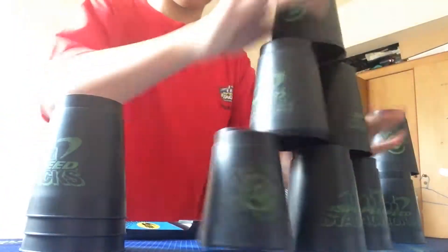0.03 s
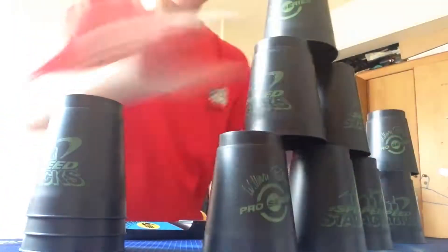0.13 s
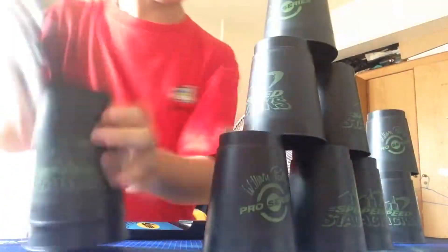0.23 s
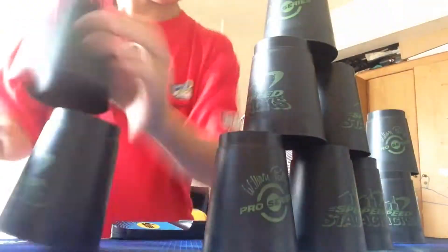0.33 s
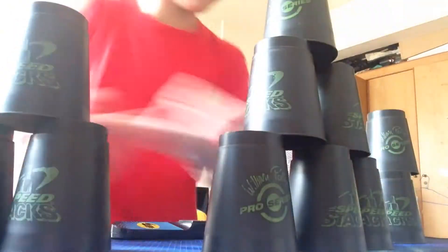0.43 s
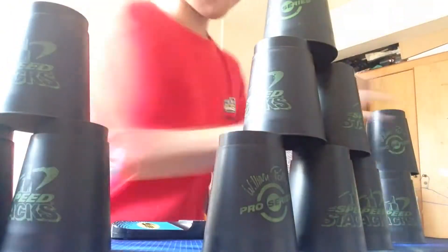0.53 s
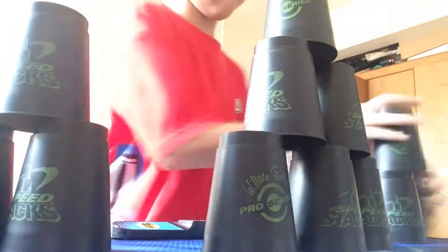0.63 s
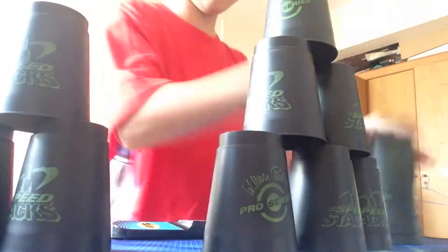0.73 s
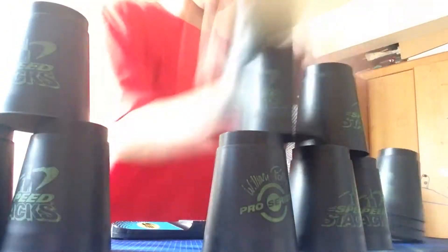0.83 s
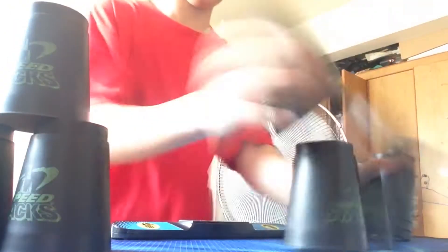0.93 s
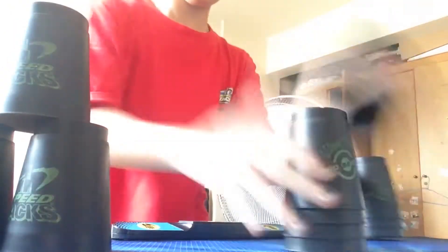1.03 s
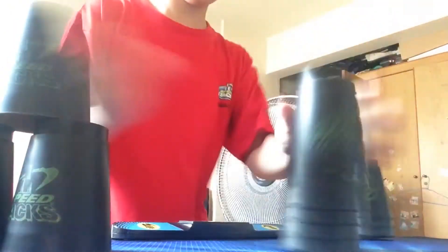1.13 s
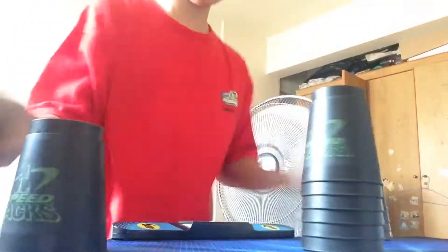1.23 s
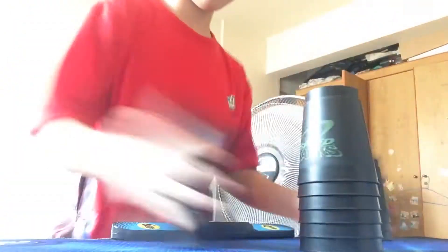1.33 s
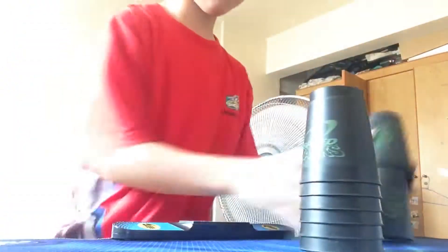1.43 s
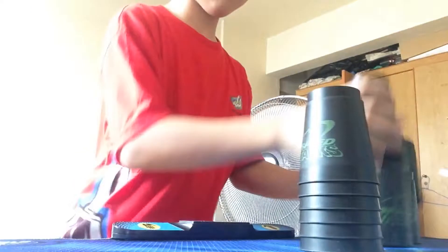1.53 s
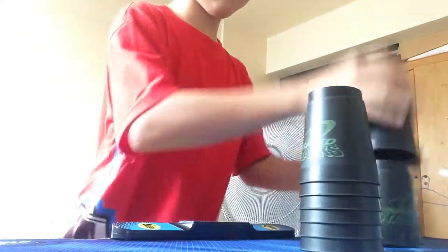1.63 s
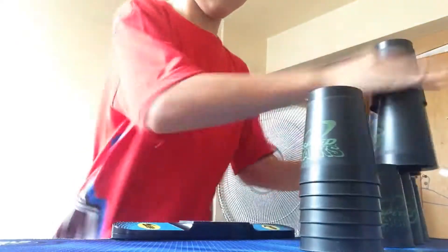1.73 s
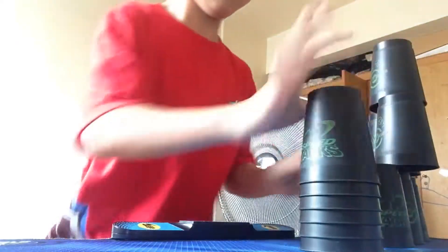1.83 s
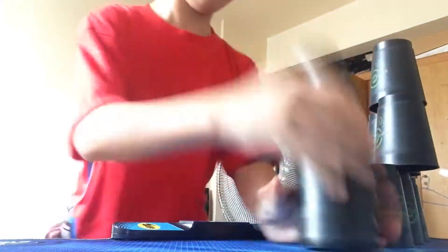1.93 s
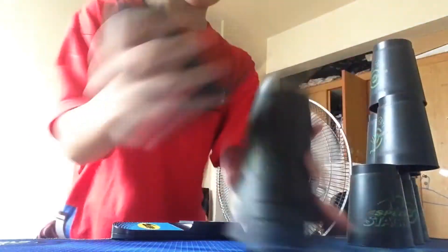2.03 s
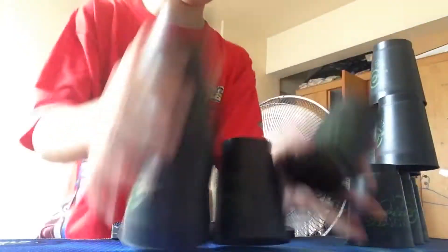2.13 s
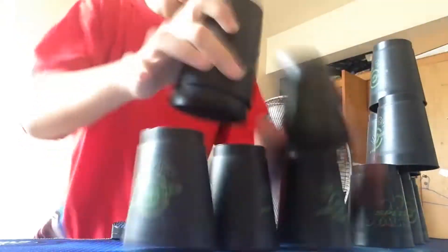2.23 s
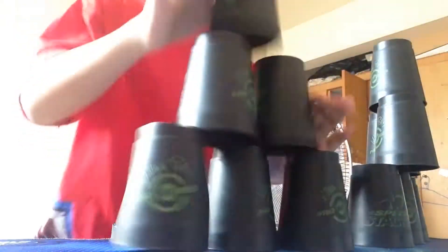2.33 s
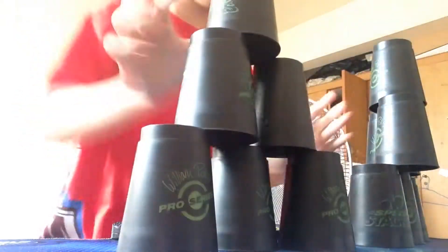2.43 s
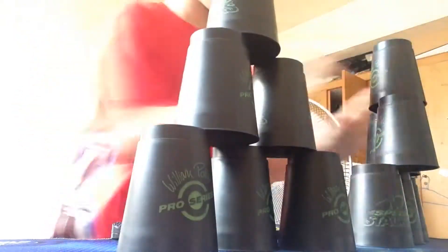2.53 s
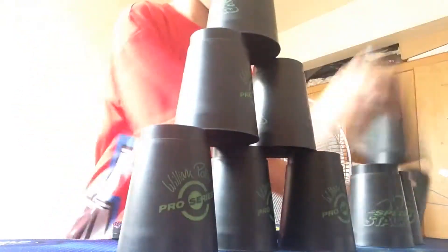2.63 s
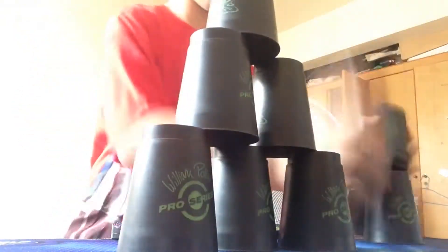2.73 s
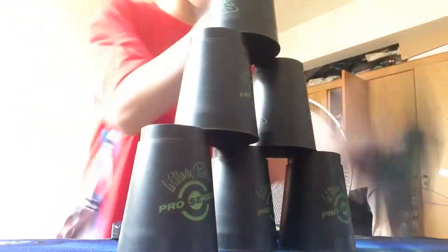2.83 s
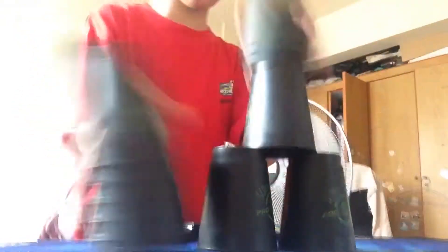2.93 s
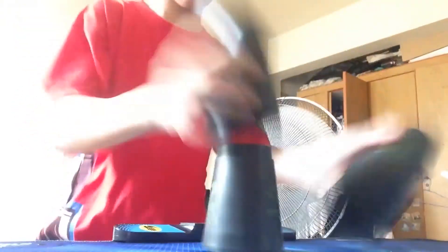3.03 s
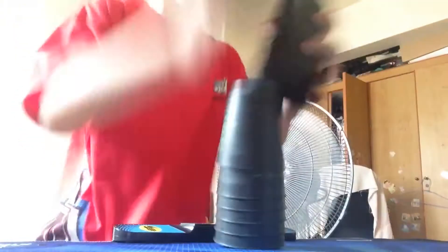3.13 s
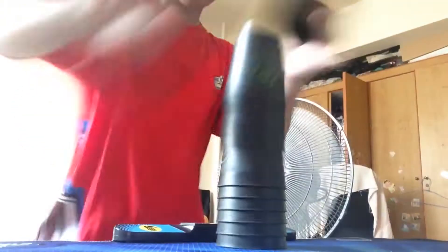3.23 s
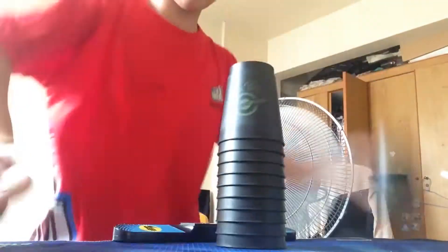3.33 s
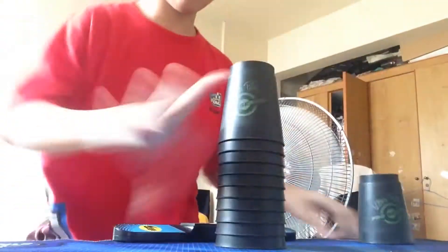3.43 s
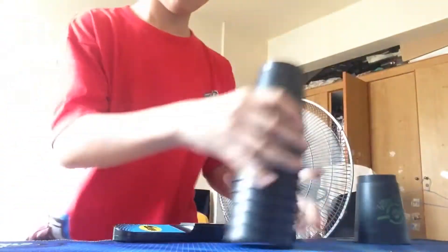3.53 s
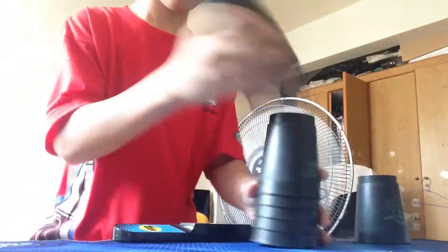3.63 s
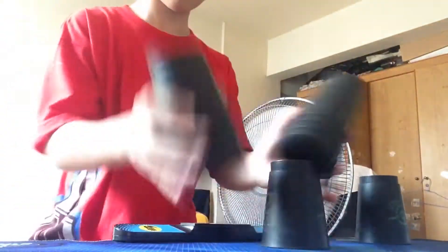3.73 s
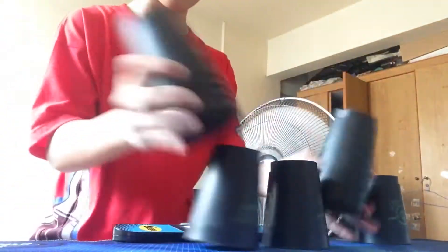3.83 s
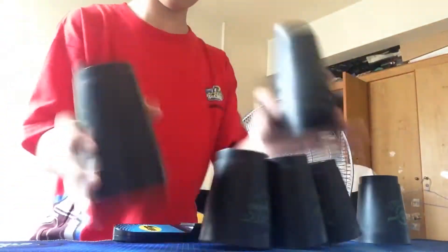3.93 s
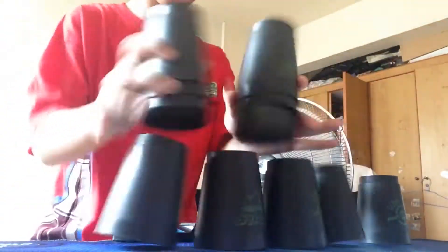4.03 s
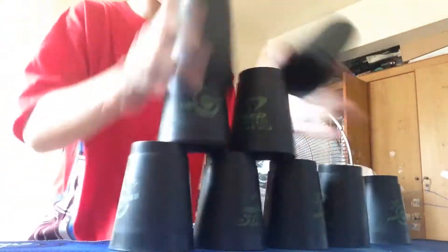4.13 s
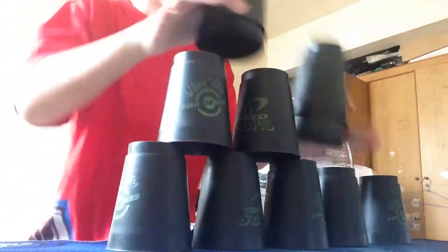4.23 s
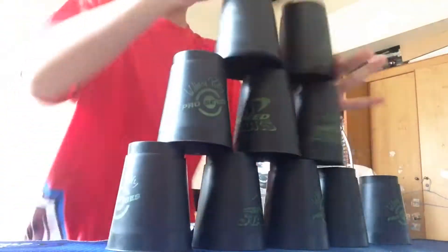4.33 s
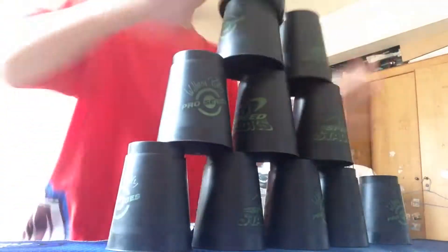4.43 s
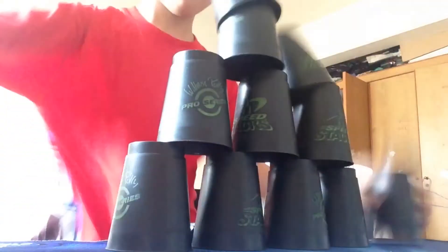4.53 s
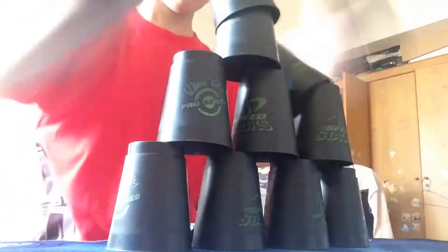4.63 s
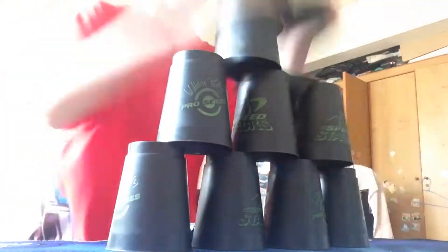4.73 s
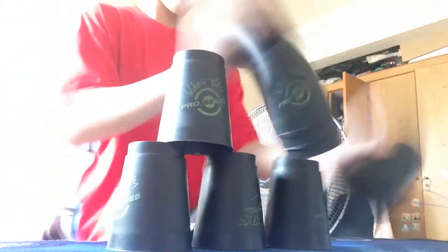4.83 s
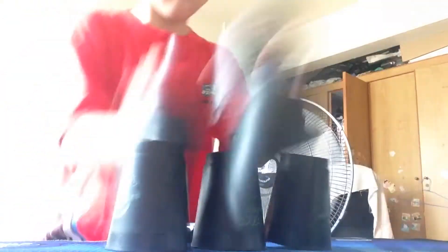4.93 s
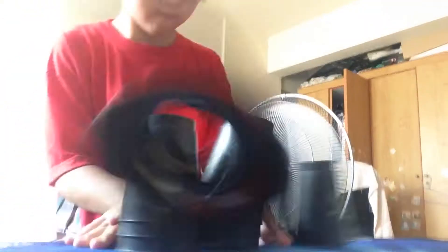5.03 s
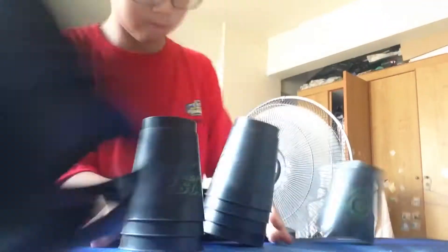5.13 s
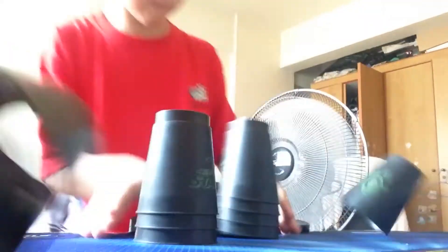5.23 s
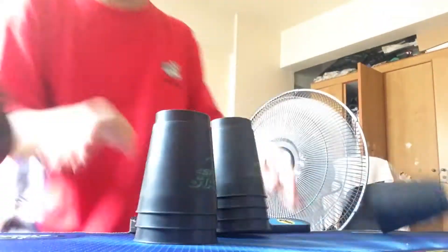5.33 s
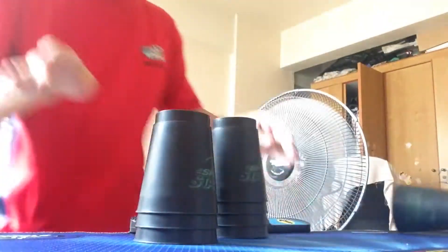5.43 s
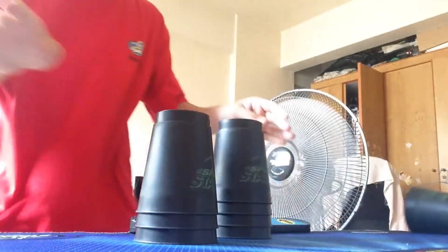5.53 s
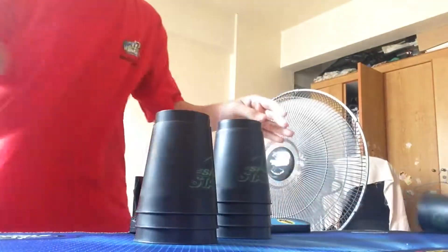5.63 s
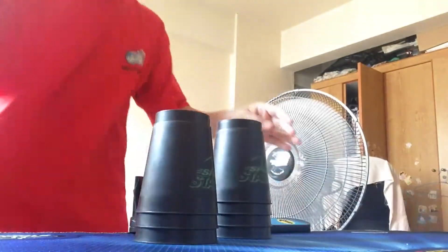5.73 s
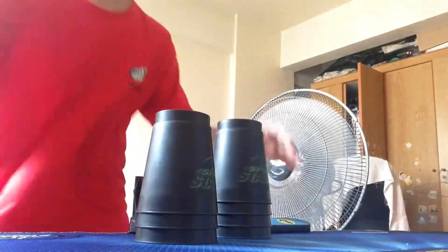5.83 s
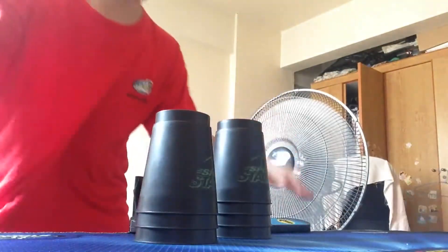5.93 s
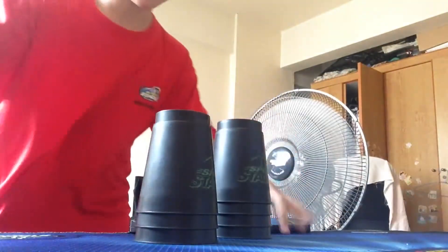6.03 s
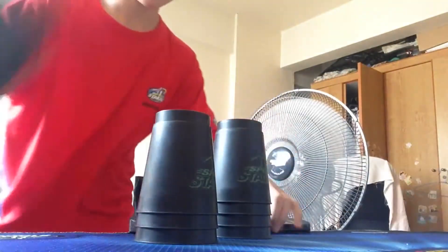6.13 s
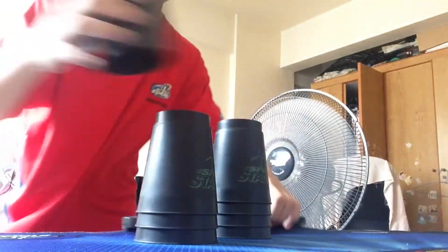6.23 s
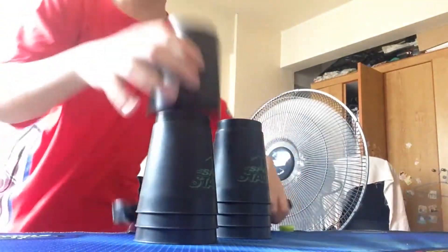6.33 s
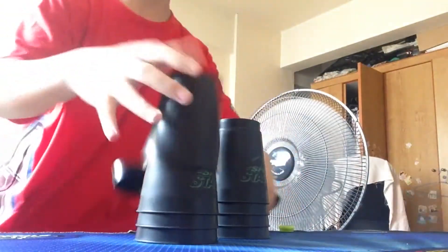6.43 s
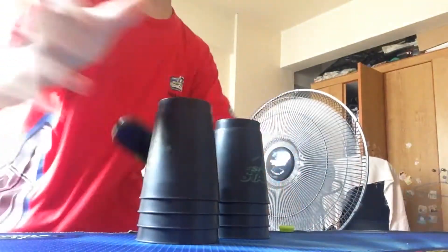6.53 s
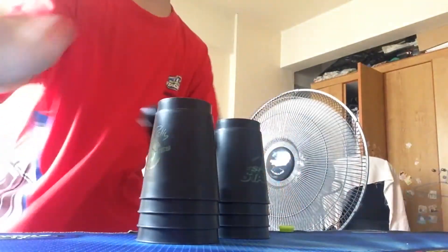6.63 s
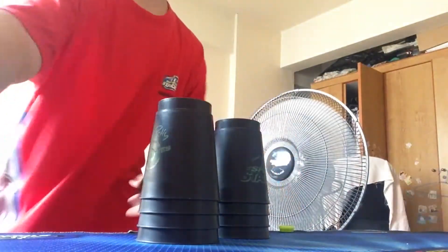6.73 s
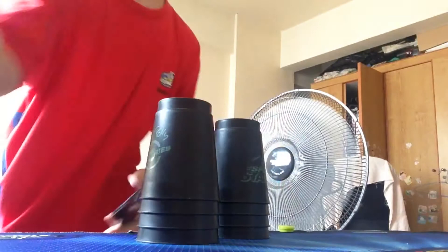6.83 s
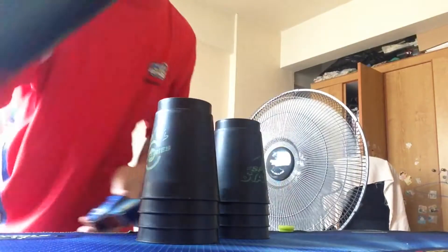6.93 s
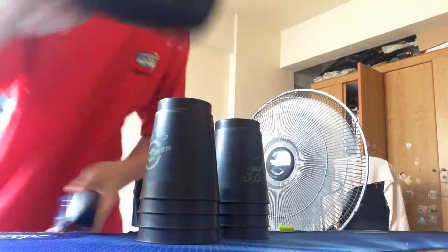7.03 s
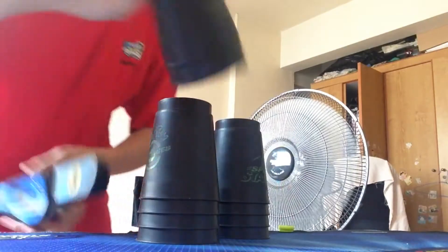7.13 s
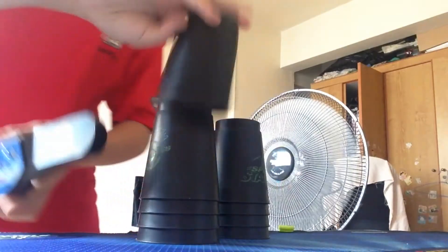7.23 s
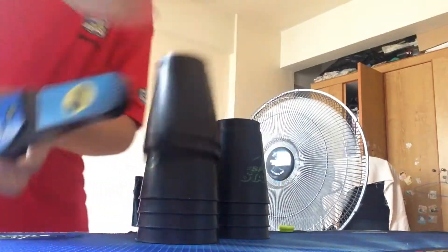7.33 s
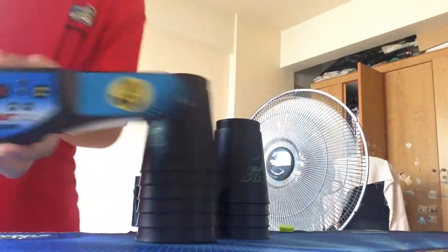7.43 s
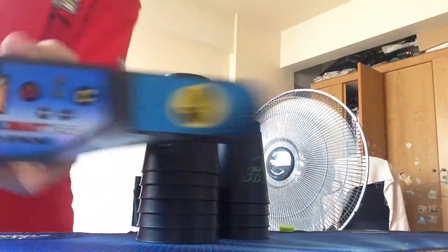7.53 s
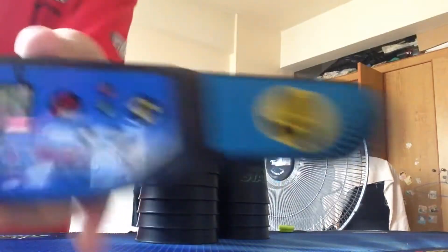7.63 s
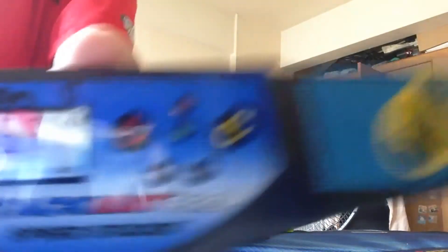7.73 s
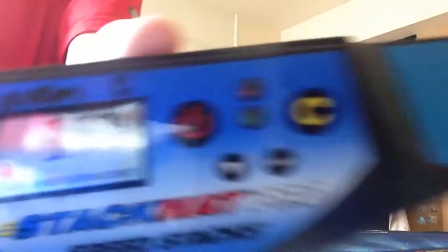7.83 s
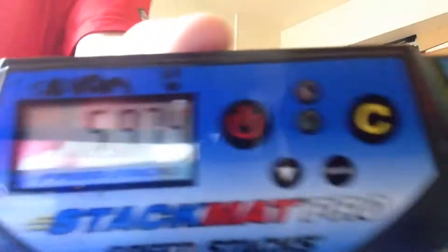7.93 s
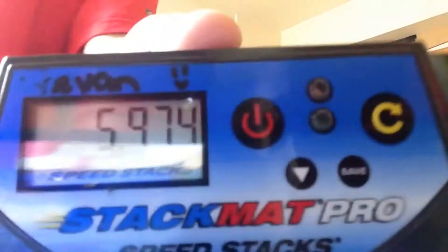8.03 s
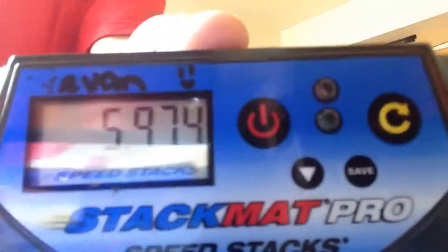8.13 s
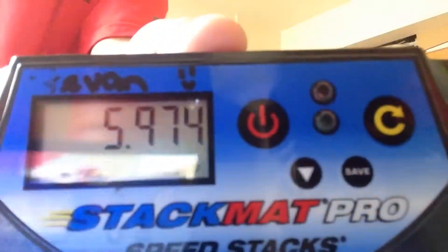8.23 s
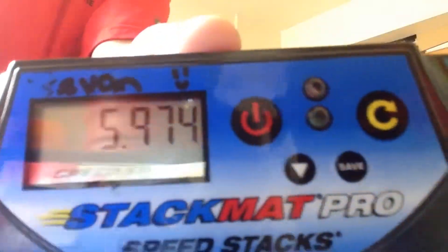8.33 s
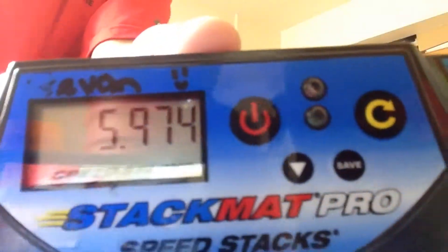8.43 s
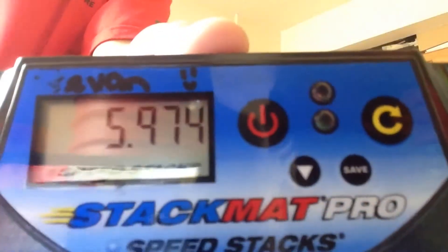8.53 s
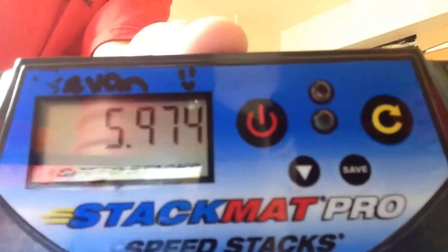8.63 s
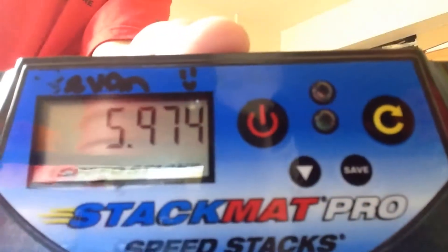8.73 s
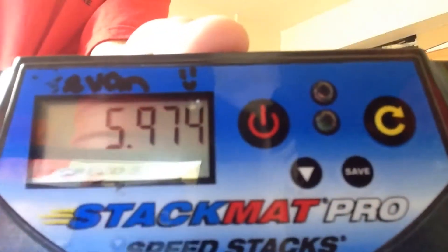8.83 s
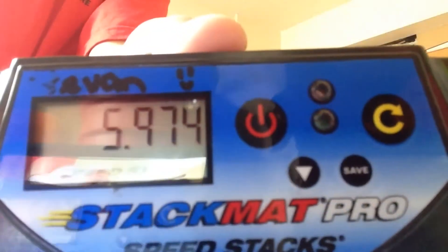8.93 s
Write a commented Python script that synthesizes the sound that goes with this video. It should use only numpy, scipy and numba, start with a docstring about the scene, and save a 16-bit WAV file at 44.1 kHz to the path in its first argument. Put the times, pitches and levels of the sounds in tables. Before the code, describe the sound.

Hollow plastic cups clatter, pop and rattle in rapid bursts as they are stacked and swept down over a steady fan hum.

```python
"""A small room with a humming fan: plastic cups are stacked into pyramids and swept down at speed on a mat,
right in front of a small microphone. Each contact pumps the air in a cup, rings its wall and ticks at the rim.
Nesting cups chatter on random bumps and scrape on gritty noise; damped low modes make soft bumps on the table.
The fan is a set of wavering blade tones over coloured noise.
At the end a timer is lifted, held before the microphone, where it colours the fan's air, and handled."""
import sys
import numpy as np
from scipy import signal
from scipy.fft import rfft, irfft
from scipy.io import wavfile
from scipy.ndimage import uniform_filter1d, minimum_filter1d
from numba import njit

SR = 44100
rng = np.random.default_rng(int(sys.argv[2]) if len(sys.argv) > 2 else 0)


def file_out(sig):
    """Save sig as 16-bit WAV at sys.argv[1]."""
    # one column per channel
    cols = np.atleast_2d(sig).T
    # limit, then scale
    lim = np.clip(cols, -1, 1)
    pcm = np.round(lim * 32767).astype(np.int16)
    wavfile.write(sys.argv[1], SR, pcm)


N = 396018
TIME = np.arange(N) / SR  # seconds


def undb(db):
    """Decibels to gain."""
    return 10 ** (np.asarray(db) / 20)


def unit(x):
    """Scale to rms 1."""
    return x / np.sqrt(np.mean(x ** 2) + 1e-20)


def blow(x):
    """Scale to the energy of 5 ms at rms 1, so that short and long rings strike equally hard."""
    return x * np.sqrt(SR / 200 / (np.sum(x ** 2) + 1e-20))


def add(out, s, x):
    """Mix x into out, starting at s seconds."""
    i = max(int(s * SR), 0)
    out[i:i + len(x)] += x[:max(len(out) - i, 0)]


def fade(t, t60):
    """Exponential decay by 60 dB in t60 seconds."""
    return np.exp(-np.log(1000) * t / t60)


def ring(t, hz, t60):
    """One struck mode: a sine that dies away."""
    return np.sin(2 * np.pi * hz * t) * fade(t, t60)


def through(x, response):
    """Pass a sound through an impulse response."""
    return signal.fftconvolve(x, response)[:len(x)]


def colour(points, size=512):
    """Minimum-phase impulse response with the given (Hz, dB) spectrum."""
    hz, db = np.transpose(points)
    bins_hz = np.arange(size // 2 + 1) * SR / size
    gain = undb(np.interp(np.log(bins_hz + 1), np.log(hz), db))
    # folding the cepstrum forward makes the response causal
    cepstrum = irfft(np.log(gain))
    cepstrum[1:size // 2] *= 2
    cepstrum[size // 2 + 1:] = 0
    return irfft(np.exp(rfft(cepstrum)))


def resonator(modes):
    """Impulse response of (Hz, dB, t60) modes, each with the given gain at its peak."""
    t = TIME[:SR // 2]
    return sum(undb(db) * ring(t, hz, t60) * 2 * np.log(1000) / (t60 * SR) for hz, db, t60 in modes)


def walk(rate):
    """Random drift in straight lines between normal draws, rate of them per second."""
    knots = rng.standard_normal(int(N / SR * rate) + 2)
    return np.interp(TIME * rate, np.arange(len(knots)), knots)


# Spectrum of the fan's rush of air in the open. Each row: frequency in Hz, relative level in dB.
AIR_OPEN = [(25, -31), (50, 10), (90, 1.5), (200, 1.5), (350, -2.5), (650, -4), (1300, -5), (1900, -11.5),
            (3000, -16), (5000, -18), (8000, -23.5), (12000, -33), (15500, -35)]
# The same rush with the timer before the microphone. Each row: frequency in Hz, relative level in dB.
AIR_SCREENED = [(30, -18), (60, -4), (100, -11.5), (200, -5), (300, -9), (450, -12.5), (620, -11.5),
                (1100, -14), (1500, -16), (1900, -24.5), (2250, -20.5), (3100, -21.5), (3900, -27),
                (6500, -30), (15000, -43)]
# The timer moves in front of the microphone: start and end in seconds.
TIMER_UP_S = [7.57, 7.9]
# Blade tones. Each row: multiple of the blade rate, rms level in dB before the moves of FAN_PATH.
BLADE_TONES = [(1, -47.5), (2, -42), (3, -48), (4, -49.5), (7, -90), (8, -52.5), (10, -55)]
# The fan as the body and then the timer screen it.
# Each row: time in seconds, gain of the air in dB, of the upper tones in dB, of the lowest tone in dB.
FAN_PATH = [(0, -1, 0.5, 5), (3.5, 0, -0.5, 0), (5.2, 6.5, 2.5, -13), (5.7, 0, -4, 4),
            (6.5, 2.5, 3.5, -0.5), (7.4, 0, -2, 6), (7.9, -1.5, -4, -28), (8.4, -3.5, -3, 7),
            (9, -2, -8, -2)]
BLADE_HZ = 68  # mean blade rate


def fan(air_db=-38):
    """Blade tones waver over the rush of air; the timer colours the rush once it is held up close."""
    s, *columns = np.transpose(FAN_PATH)
    air, upper, lowest = (undb(np.interp(TIME, s, column)) for column in columns)
    phase = 2 * np.pi * np.cumsum(BLADE_HZ * (1 + 0.00324 * walk(3))) / SR
    tones = []
    for multiple, db in BLADE_TONES:
        start = 2 * np.pi * rng.random()
        tones.append(np.sqrt(2) * undb(db) * np.sin(round(multiple) * phase + start))
    free = unit(through(rng.standard_normal(N), colour(AIR_OPEN, size=4096)))
    screened = unit(through(rng.standard_normal(N), colour(AIR_SCREENED, size=4096)))
    cover = np.interp(TIME, TIMER_UP_S, [0, 1])
    rush = np.sqrt(1 - cover) * free + np.sqrt(cover) * screened
    rush = rush * undb(0.2 * walk(19))  # slight flutter
    return lowest * tones[0] + upper * sum(tones[1:]) + undb(air_db) * air * rush


def hollow(t, hz, cycles, rise_s):
    """The air in a cup: it swings up as the rim seals, then falls by 60 dB in the given cycles."""
    return ring(t, hz, cycles / hz) * (1 - np.exp(-t / rise_s))


# Modes of a cup's wall.
# Each row: centre of its tuning in Hz, relative level in dB, t60 in seconds at a sustain of 1.
WALL = [(851, 2, 0.019), (1065, 4, 0.037), (1214, -4, 0.046), (1340, 1.5, 0.027), (1515, 0, 0.026),
        (1745, -5.5, 0.021), (1960, -9.5, 0.023), (2354, -10, 0.012)]


def wall(t, sustain=1):
    """The wall's modes; their mix and tuning depend on where the cup is hit and held."""
    hz, db, t60 = np.transpose(WALL)[:, :, None]
    strike, grip = rng.standard_normal((2, len(WALL), 1))
    modes = undb(db) * strike * ring(t, hz * (1 + 0.054 * grip), sustain * t60)
    return np.sum(modes, axis=0)


def tick(t, ring_t60=0.017, snap_t60=0.002, snap_db=1, count=30):
    """A rim strikes: a snap of noise and many high, quickly damped shell modes, other ones each time."""
    t = t[:SR // 40]
    hz = 2000 * 7 ** rng.random((count, 1))  # 2 to 14 kHz
    modes = np.sum(rng.standard_normal((count, 1)) * ring(t, hz, ring_t60), axis=0)
    snap = rng.standard_normal(len(t)) * fade(t, snap_t60)
    return blow(modes) + undb(snap_db) * blow(snap)


# Spectrum that colours the rim ticks. Each row: frequency in Hz, relative level in dB.
RIM = [(1200, -7), (2100, -1), (3000, 6.5), (3900, 4), (5300, 9.5), (7000, 5.5), (9000, 0.5), (12000, -2.5),
       (15500, -7)]
# How a cup can strike: flat (the whole rim meets the mat and traps the air), tilted (one side of the rim first),
# stack (set down on top of other cups), nest (drops home into another cup, cushioned by air),
# edge (a rim catches on another cup), clack (a cup jams in a stack, which rings as a whole),
# side (wall against wall), rim (rims just clip each other).
# Each entry: hollow share in dB, wall share in dB, rim tick share in dB, the tick dulls above this in Hz,
# wall ring time as a multiple.
CONTACTS = {"flat": (-1, -22, -25.5, 5000, 0.5), "tilted": (1.5, -11.5, -10.5, 6500, 1.3),
            "stack": (0, -8, -12, 7000, 1), "nest": (-1, -7, -27.5, 4000, 1),
            "edge": (0.5, 1, -1, 15001, 1), "clack": (-9, 0, -12.5, 6000, 2),
            "side": (-6, -0.5, -8, 12000, 1), "rim": (-7.5, -9, 0, 15000, 0.9)}
# The clear knocks: pyramids are finished and swept down, three and six go up and come down into one stack,
# ten go up and collapse, then stray cups are gathered and the timer is picked up.
# Each row: start in seconds, strength in dB before the contact's shares, hollow pitch in Hz, contact.
KNOCKS = [ (0.0159, -2.5, 764, "stack"), (0.0778, -4, 560, "tilted"), (0.0979, -0.5, 600, "stack"),
          (0.2319, -29.5, 433, "edge"), (0.2608, -23.5, 770, "rim"), (0.306, -27.5, 450, "rim"),
          (0.3756, -6.5, 706, "nest"), (0.4123, -11, 810, "edge"), (0.4192, -7.5, 432, "stack"),
          (0.617, -15, 430, "nest"), (0.6807, -19, 593, "rim"), (0.7569, -15.5, 420, "edge"),
          (0.8207, -19, 766, "tilted"), (0.8447, 0, 436, "flat"), (0.851, -5.5, 530, "nest"),
          (0.8642, -3, 547, "edge"), (0.8864, -2.5, 720, "side"), (0.894, -4, 714, "rim"),
          (0.9154, -4.5, 382, "stack"), (1.0027, -10, 670, "edge"), (1.019, -3, 535, "tilted"),
          (1.0448, 1.5, 600, "edge"), (1.1283, -9, 317, "edge"), (1.183, 0, 726, "tilted"),
          (1.2198, -3, 715, "clack"), (1.23, 1.5, 835, "clack"), (1.3057, -1.5, 605, "tilted"),
          (1.3218, -3.5, 660, "stack"), (1.349, -6, 400, "flat"), (1.398, -11, 580, "stack"),
          (1.6245, -6.5, 523, "flat"), (1.7016, -9, 690, "tilted"), (1.7337, 1, 683, "stack"),
          (1.7527, -0.5, 620, "clack"), (1.9157, -12, 527, "tilted"), (2.0419, -6.5, 476, "flat"),
          (2.1067, -6.5, 677, "side"), (2.1239, -7, 354, "flat"), (2.138, -8, 510, "tilted"),
          (2.1442, -17.5, 404, "rim"), (2.2141, -7.5, 480, "flat"), (2.222, -22.5, 520, "rim"),
          (2.308, -7, 667, "clack"), (2.3187, -10, 583, "stack"), (2.3571, -1.5, 593, "tilted"),
          (2.375, -10, 714, "edge"), (2.3839, -6, 875, "clack"), (2.3921, -2, 630, "clack"),
          (2.6368, -19, 800, "edge"), (2.6635, -12, 417, "edge"), (2.678, -9.5, 634, "side"),
          (2.6959, -8, 554, "rim"), (2.71, 3.5, 510, "flat"), (2.7709, 9, 696, "flat"),
          (2.8193, -7, 780, "edge"), (2.8924, -8.5, 563, "rim"), (2.91, 4.5, 845, "clack"),
          (2.9265, -2.5, 616, "side"), (2.9471, 0, 382, "stack"), (2.9688, -4, 557, "stack"),
          (2.997, 9.5, 666, "side"), (3.0272, -2.5, 458, "tilted"), (3.0745, -5, 480, "tilted"),
          (3.1804, -19, 690, "side"), (3.3035, -18.5, 720, "edge"), (3.3119, -4, 610, "nest"),
          (3.3705, 5, 740, "nest"), (3.6225, -15, 620, "flat"), (3.813, -11.5, 426, "tilted"),
          (3.8947, -3.5, 572, "flat"), (3.9061, -22, 413, "rim"), (3.989, -9.5, 500, "flat"),
          (3.999, -7, 330, "stack"), (4.0823, 1, 590, "stack"), (4.1492, -1, 525, "stack"),
          (4.163, -11, 715, "tilted"), (4.21, -17, 576, "stack"), (4.2396, -16.5, 670, "stack"),
          (4.3018, 3.5, 593, "stack"), (4.3093, -5.5, 586, "stack"), (4.3245, -4, 550, "stack"),
          (4.3765, 2, 574, "stack"), (4.3931, -2.5, 590, "clack"), (4.434, -11, 590, "edge"),
          (4.5356, -12, 467, "flat"), (4.619, -15, 554, "stack"), (4.6892, -18.5, 563, "flat"),
          (4.734, -17, 650, "stack"), (4.74, -3, 720, "edge"), (4.7555, -1, 745, "clack"),
          (4.7743, 6.5, 594, "stack"), (4.7958, 5.5, 545, "stack"), (4.8075, -3, 544, "tilted"),
          (4.9017, 2.5, 595, "nest"), (4.9106, 0, 605, "stack"), (4.9327, 0.5, 650, "clack"),
          (4.9428, 0.5, 610, "side"), (4.9701, 0, 825, "nest"), (5.0238, -6, 372, "tilted"),
          (5.0713, -8, 560, "rim"), (5.081, -5.5, 880, "rim"), (5.1312, -18, 850, "edge"),
          (5.172, -11, 373, "flat"), (5.186, -7, 694, "edge"), (5.205, -9, 840, "edge"),
          (5.2712, -16.5, 413, "rim"), (5.298, -17.5, 404, "rim"), (5.4391, -16.5, 560, "nest"),
          (5.523, -20, 446, "tilted"), (5.8595, -21.5, 382, "nest"), (5.9215, -18, 320, "stack"),
          (6.301, -21, 750, "clack"), (6.3975, -16.5, 594, "clack"), (6.5297, -10.5, 487, "clack"),
          (6.721, -11, 730, "flat"), (6.763, -12.5, 640, "rim"), (7.191, -8, 503, "stack"),
          (7.2335, -17.5, 535, "edge"), (7.303, -9.5, 350, "stack"), (7.3616, -21, 724, "edge"),
          (7.4329, -17.5, 623, "edge")]


def knocks(cycles=9.1, rise_s=0.0009, under_db=-7, under_cycles=8.9, rock_s=0.0036, rock_db=-4,
           hollow_db=0, wall_db=0, tick_db=-1.5, rebound_s=0.012, rebound_db=-13):
    """Each contact: a hollow pop over a lower ring, the wall's ring and a rim tick; the cup rebounds once."""
    out, t = np.zeros(N), TIME[:SR // 12]
    for s, db, hz, contact in KNOCKS:
        air_db, shell_db, rim_db, dull_hz, sustain = CONTACTS[contact]
        rim = signal.lfilter(*signal.butter(1, dull_hz, fs=SR), colour(RIM))
        air_gain = undb(db + air_db + hollow_db)
        wall_gain = undb(db + shell_db + wall_db)
        tick_gain = undb(db + rim_db + tick_db)
        damping, seat, tilt, spring = rng.standard_normal(4)
        pop = blow(hollow(t, hz, cycles * np.exp(0.3 * damping), rise_s))
        under = blow(hollow(t, 0.705 * hz * np.exp(0.13 * seat), under_cycles, rise_s))
        add(out, s, air_gain * blow(pop + undb(under_db) * under))
        bounce_s = rebound_s * np.exp(0.3 * spring)
        for late, loss_db in ((0, 0), (bounce_s, rebound_db)):
            add(out, s + late, undb(loss_db) * wall_gain * blow(wall(t, sustain)))
            add(out, s + late, undb(loss_db) * tick_gain * blow(through(tick(t), rim)))
        # a cup lands askew, so the far side of its rim follows a moment later
        far_s = s + rock_s * np.exp(0.5 * tilt)
        add(out, far_s, undb(rock_db) * tick_gain * blow(through(tick(t), rim)))
    return out


# Modes of the table top. Each row: frequency in Hz, relative gain at the peak in dB, t60 in seconds.
TABLE = [(76, -9, .07), (130.3, 28.5, 0.21), (160.5, 26, 0.17), (225.6, 20, 0.13)]


def table(cups, db=-22):
    """The table top under the mat booms faintly with the cups."""
    return undb(db) * through(cups, resonator(TABLE))


def slips(rate, spread_db):
    """Stick-slip: sparse pulses of random sign and size, about rate of them per second."""
    size = undb(spread_db * np.minimum(rng.exponential(size=N), 4))
    sign = rng.choice([-1, 1], N)
    return size * sign * (rng.random(N) < rate / SR)


def chatter(pitch, rate=150, scatter=0.648, cycles=15.5, spread_db=15):
    """Loose cups rattle at rate bumps per second, each with its own air pitch, wall ring and rim tick."""
    air, shell, rims = np.zeros((3, N))
    t = TIME[:SR // 20]
    walls = [blow(wall(t)) for _ in range(32)]
    ticks = [blow(tick(t)) for _ in range(32)]
    for k, (late, depth, force, spot) in enumerate(rng.random((int(rate * N / SR), 4))):
        s = (k + late) / rate
        size = undb(spread_db * force)
        hz = pitch[min(int(s * SR), N - 1)] * np.exp(scatter * (2 * depth - 1))
        add(air, s, size * blow(hollow(t, hz, cycles, 0.00028)))
        add(shell, s, size * walls[int(spot * len(walls))])
        add(rims, s, size * ticks[int(spot * len(ticks))])
    return unit(air), unit(shell), unit(rims)


# Spectrum of plastic scraping. Each row: frequency in Hz, relative level in dB.
SCRAPE = [(1100, 2), (2000, 2.5), (3100, 0.5), (3900, 0.5), (5300, 2.5), (7000, -0.5), (9000, -5.5),
          (12000, -11), (15500, -17)]
# How plastic can slide: loose (cups rattle down over each other), snug (a stack closes up on its cushion of air),
# graze (a wall skims along a rim), brush (a hand brushes over plastic), mat (dragged over the mat).
# Each entry: hollow share in dB, wall share in dB, hiss share in dB.
RUBS = {"loose": (0, -4.5, -9.5), "snug": (0, -1, -25), "graze": (0, -0.9, 0), "brush": (-3, -2.2, 0.71),
        "mat": (0, -21, -17)}
# The slides.
# Each row: start in seconds, length in seconds, strength in dB before the rub's shares,
# hollow pitch in Hz around which the bumps scatter, rub.
SLIDES = [(0.02, 0.068, -25, 784, "snug"), (0.071, 0.03, -12, 600, "loose"),
          (0.379, 0.052, -14.5, 540, "snug"), (0.612, 0.067, -30, 545, "snug"),
          (0.698, 0.12, -26, 513, "graze"), (0.844, 0.021, -10.5, 553, "loose"),
          (0.897, 0.08, -12.5, 457, "loose"), (1.02, 0.058, -7.5, 452, "loose"),
          (1.091, 0.078, -18, 470, "loose"), (1.176, 0.043, -13.5, 740, "snug"),
          (1.713, 0.065, -15.5, 612, "loose"), (2.14, 0.07, -25.5, 335, "mat"),
          (2.355, 0.029, -12, 700, "loose"), (2.587, 0.06, -20.5, 507, "mat"),
          (2.674, 0.13, -16, 513, "graze"), (2.884, 0.045, -12.5, 624, "graze"),
          (2.94, 0.13, -6.5, 460, "loose"), (3.062, 0.12, -21.5, 496, "graze"),
          (3.31, 0.035, -8, 637, "snug"), (3.372, 0.058, -12, 613, "snug"), (4.16, 0.073, -31, 536, "snug"),
          (4.31, 0.14, -26, 596, "loose"), (4.756, 0.079, -2.5, 550, "loose"),
          (4.94, 0.079, -3.5, 520, "loose"), (5.045, 0.048, -25.5, 414, "graze"),
          (5.182, 0.031, -20, 574, "graze"), (5.34, 0.04, -23, 617, "loose"),
          (5.41, 0.098, -22.5, 338, "mat"), (5.574, 0.022, -34, 442, "brush"),
          (5.745, 0.022, -34, 570, "graze"), (5.86, 0.015, -27, 413, "mat"),
          (5.92, 0.045, -19.5, 292, "brush"), (6.03, 0.51, -42.5, 500, "graze"),
          (6.139, 0.032, -24, 763, "brush"), (6.278, 0.055, -29.5, 790, "snug"),
          (6.49, 0.014, -36, 372, "brush"), (6.532, 0.045, -27.5, 357, "graze"),
          (6.712, 0.03, -15.5, 787, "snug"), (6.863, 0.028, -25.5, 580, "loose"),
          (7.065, 0.021, -39, 640, "graze"), (7.29, 0.0058, -19.5, 380, "loose"),
          (7.46, 0.043, -42.5, 580, "graze"), (7.593, 0.034, -40, 535, "brush"),
          (7.695, 0.044, -33, 386, "loose")]


def slides(rise_s=0.0033, stop_t60=0.16, hollow_db=-1, wall_db=-1, hiss_db=-1, uneven_db=3.0):
    """Cups run down into each other: chatter and a gritty scrape that die away as they seat."""
    force = np.zeros((3, N))  # hollow, wall, hiss
    pitch = np.full(N, float(SLIDES[0][3]))
    for s, length, db, hz, rub in SLIDES:
        t = TIME[:int((length + stop_t60) * SR)]
        shape = np.minimum(t / rise_s, 1) * fade(np.maximum(t - length, 0), stop_t60)
        pitch[int(s * SR):] = hz
        for row, share_db in zip(force, RUBS[rub]):
            add(row, s, undb(db + share_db) * shape)
    air, shell, rims = chatter(pitch)
    rubbing = unit(slips(rate=5000, spread_db=-0.5)) + rims
    grit = unit(through(rubbing, colour(SCRAPE))) * undb(uneven_db * walk(130))
    hollows = undb(hollow_db) * force[0] * air
    walls = undb(wall_db) * force[1] * shell
    return hollows + walls + undb(hiss_db) * force[2] * grit


def airborne(depth_db=-6, flight_s=0.0065):
    """Before a hard knock the cup is in the air, so the chatter and scrape thin out for an instant."""
    dip = np.zeros(N)
    for s, db, _, _ in KNOCKS:
        hardness = np.clip(undb(db + 3.0), 0, 1)
        add(dip, s - flight_s, hardness * np.hanning(int(0.88 * flight_s * SR)))
    return undb(depth_db * np.minimum(dip, 1))


# Soft bumps on the table and the timer.
# Each row: start in seconds, strength of the lowest mode in dB, its pitch in Hz.
THUDS = [(0.378, -13, 202), (0.42, -9, 204), (0.955, -4, 229), (1.047, -0.5, 154), (1.355, -5, 330),
         (1.405, -7, 166), (2.69, -12, 229), (2.952, 1.5, 349), (2.975, 2, 236), (3.046, 0.5, 157),
         (4.556, -9.5, 130), (5.020, -1.5, 219), (5.041, -8.5, 145), (5.398, -21.5, 330), (5.443, -8, 201),
         (5.487, -17, 193), (5.524, -18, 327), (5.925, -13.5, 232), (6.513, -17, 350), (6.539, -10.5, 280),
         (7.313, -34, 327), (8.333, -15.5, 155), (8.364, -18.5, 129), (8.531, -22.5, 194),
         (8.569, -22.5, 143), (8.691, -28, 210), (8.729, -19, 159)]
THUD_T60_S = 0.086  # lowest mode


def thuds(second_db=-6, third_db=-10):
    """Soft bumps: a low mode, and two higher ones that die sooner."""
    out, t = np.zeros(N), TIME[:SR // 5]
    for s, db, hz in THUDS:
        low = hollow(t, hz, hz * THUD_T60_S, 0.00043)
        second = undb(second_db) * ring(t, 1.507 * hz, 0.81 * THUD_T60_S)
        third = undb(third_db) * ring(t, 2.53 * hz, 0.55 * THUD_T60_S)
        add(out, s, undb(db) * (low + second + third))
    return out


# One knock sets something thin and metallic ringing.
# Each row: frequency in Hz, relative level in dB, t60 in seconds.
METAL = [(1240, 8.5, 1), (3000, -1, 0.43), (3640, -5, 0.76), (4129, -0.5, 0.59), (4960, -9, 0.73)]
METAL_AT_S = 6.529


def metal(db=-32):
    """A faint metallic ring of a few slowly fading modes that outlasts its knock."""
    out, t = np.zeros(N), TIME[:SR]
    add(out, METAL_AT_S, sum(undb(db + mode_db) * ring(t, hz, t60) for hz, mode_db, t60 in METAL))
    return out


# Standing cups ring along. Each row: frequency in Hz, relative gain at the peak in dB, t60 in seconds.
NEIGHBOURS = [(336.7, 10.5, 0.22), (426, 3.5, 0.29), (573, -11, 0.63), (675, 12, 0.36), (1224, 1, 0.26),
              (1330, -5, 0.22), (1530, 4, 0.41), (3500, -12, .2), (5390, 3, 0.072), (6105, -16, .15)]


def room(x, t60=0.25, wet_db=-9, ring_db=-11):
    """Close reflections thicken into a short tail; the standing cups ring along."""
    t = TIME[:SR // 2]
    density = np.minimum(0.012 + 8 * t, 1)
    echoes = rng.standard_normal(len(t)) * (rng.random(len(t)) < density) / np.sqrt(density)
    tail = echoes * (t > 0.004) * fade(t, t60)
    tail = undb(wet_db) * tail / np.linalg.norm(tail)
    return x + through(x, tail + undb(ring_db) * resonator(NEIGHBOURS))


def scene(cup_low_hz=105):
    """Cups, table and fan in the room; a small cup radiates little bass."""
    no_bass = signal.butter(2, cup_low_hz, "high", fs=SR, output="sos")
    cups = signal.sosfilt(no_bass, knocks() + slides() * airborne())
    return (room(cups + table(cups) + thuds() + metal()) + fan())[None]


@njit
def peak_follower(x, release):
    """Jumps to each peak and sinks back by the factor release per sample."""
    out, e = np.empty(len(x)), 0.
    for i in range(len(x)):
        e = max(abs(x[i]), e * release)
        out[i] = e
    return out


TOP_HZ = 15720  # the microphone's upper cutoff


def record(dry, low_hz=52, threshold_db=-16, squeeze=0.46, release_s=0.37):
    """A microphone without deep bass or top; slow gain control ducks the fan, a fast limiter holds peaks."""
    x = signal.sosfilt(signal.butter(3, low_hz, "high", fs=SR, output="sos"), dry[0])
    loudness = np.sqrt(np.abs(uniform_filter1d(x ** 2, size=441)))  # over 10 ms
    held = peak_follower(loudness, np.exp(-1 / (release_s * SR)))
    x = x * np.maximum(held / undb(threshold_db), 1) ** -squeeze
    limit = 1 / np.maximum(np.abs(x) / 0.93, 1)
    x = x * uniform_filter1d(minimum_filter1d(limit, size=65), size=65)
    return signal.sosfilt(signal.ellip(10, 0.2, 80, TOP_HZ, fs=SR, output="sos"), x)[None]


dry = scene()
out = record(dry)
file_out(out)
```